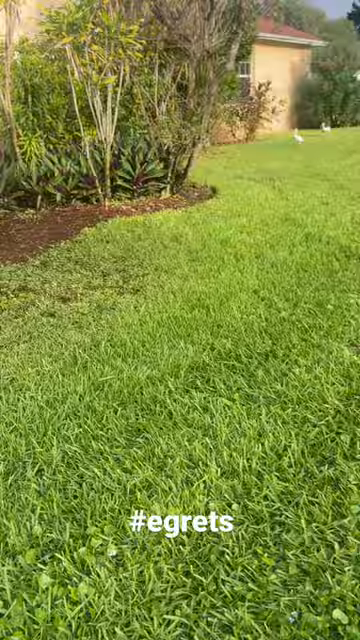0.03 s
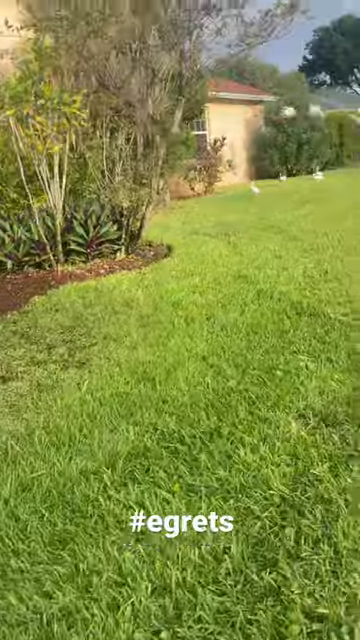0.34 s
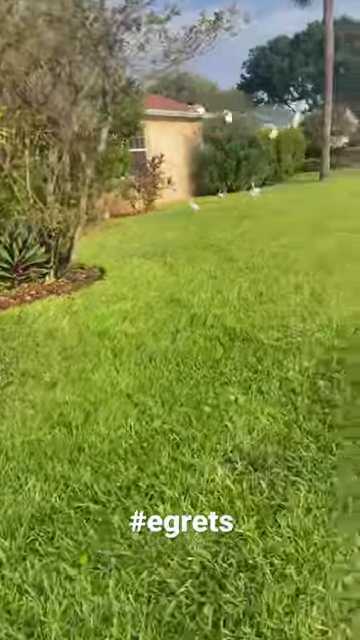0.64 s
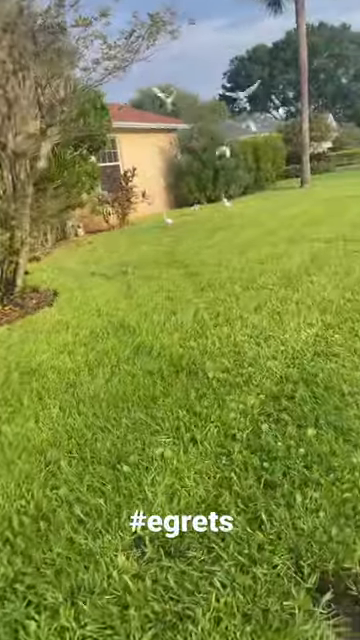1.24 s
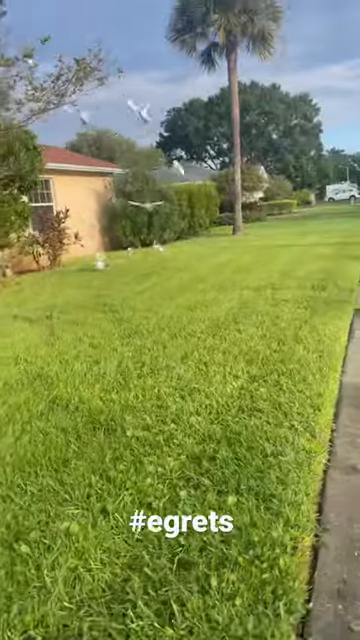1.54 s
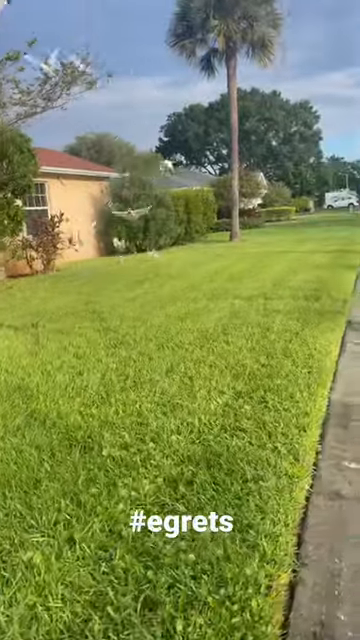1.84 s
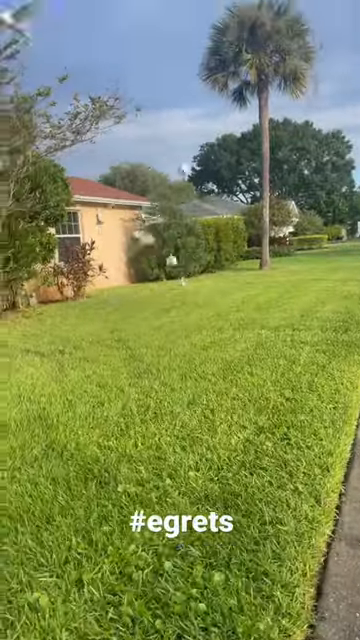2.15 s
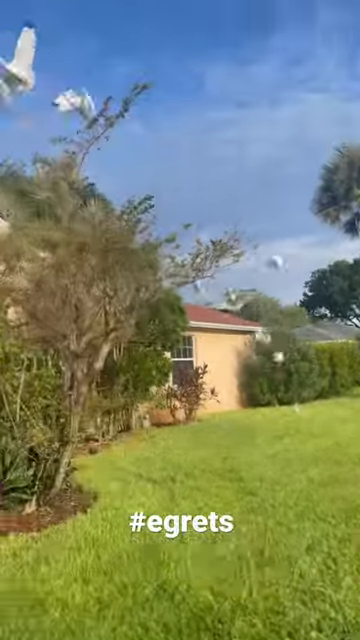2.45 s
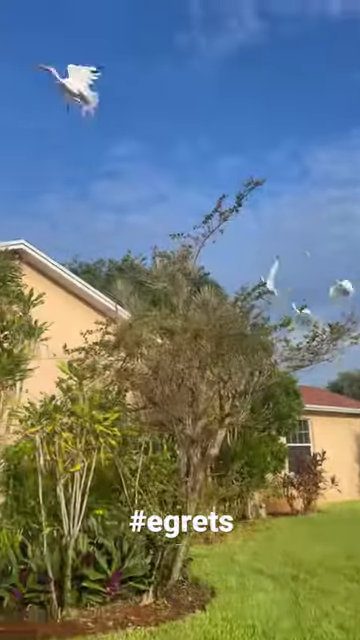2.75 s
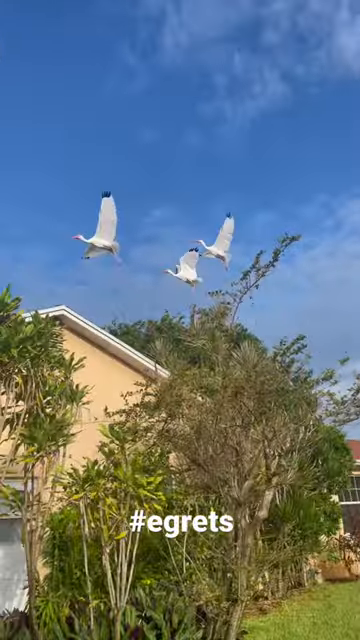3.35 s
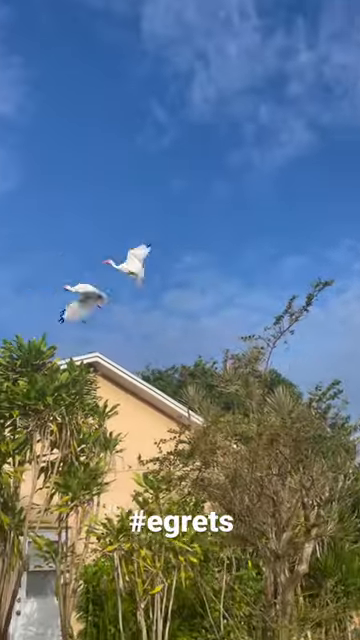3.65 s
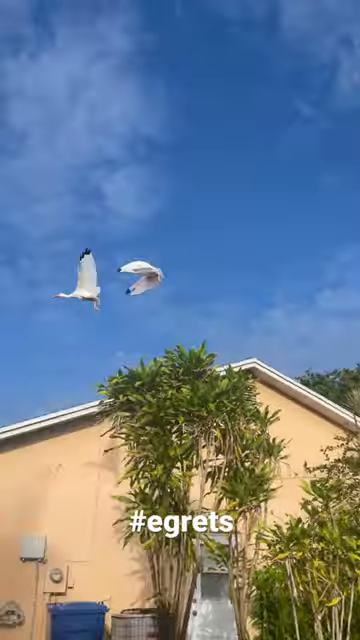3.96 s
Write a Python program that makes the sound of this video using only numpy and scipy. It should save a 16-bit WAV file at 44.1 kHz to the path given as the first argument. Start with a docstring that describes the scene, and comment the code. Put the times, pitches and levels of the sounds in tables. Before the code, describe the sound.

A low drone of traffic and tyre noise carries across a garden as one vehicle pulls away. Near the hand-held microphone are a few soft steps in grass and two light bumps, with faint birds and stirring leaves.

```python
"""A suburban lawn, with traffic heard over low rumble and tyre noise. Each engine sounds harmonics of its
firing rate: one pulls away, doubling its pitch, a second eases off, and two nearly steady motors beat
against each other. Leaves stir and small birds call faintly. Close by come soft rustles and snaps,
probably steps in the grass, and two knocks on the hand-held phone, whose two microphone ports
sample the air slightly apart."""
import sys
import numpy as np
from scipy import signal
from scipy.fft import rfft, irfft
from scipy.io import wavfile
from scipy.ndimage import uniform_filter1d

SR = 44100
rng = np.random.default_rng(int(sys.argv[2]) if len(sys.argv) > 2 else 0)


def dump(signal):
    """Clip the signal to [-1, 1] and save it as 16-bit WAV at the path in sys.argv[1]."""
    limited = np.clip(np.atleast_2d(signal).T, -1, 1)
    pcm = np.round(limited * 32767).astype(np.int16)
    wavfile.write(sys.argv[1], SR, pcm)


N = 176400
T = np.arange(N) / SR
FREQS = np.maximum(np.fft.rfftfreq(N, 1 / SR), 1)

# The two ports. Each row: frequency in Hz, coherence 0-1, left phase lead in rad, left minus right in dB.
PORTS = [(40, 1, 0, 0), (80, 1, .03, .15), (150, .998, .05, .6), (300, .95, .05, 1), (550, .58, .2, 3),
         (850, .55, 1.1, 3), (1350, .58, 1.4, 3), (1750, .8, .5, -2), (2200, .5, 1.7, -2),
         (2700, .8, 2.6, -2), (3900, .45, 2.8, 0), (4900, .75, 3.2, 0), (5900, .92, 6.2, 0),
         (7300, .8, 7.7, 0), (9000, .95, 9.4, 0), (10800, .9, 11.1, 0), (12000, .98, 12.5, 0)]
# Spectra of four background noises. Each row: frequency in Hz, relative spectral density in dB.
RUMBLE_SPECTRUM = [(20, -38), (35, -13), (55, -2.5), (80, -3.5), (130, -4.5), (200, -1.5), (270, -9),
                   (320, -10), (380, -22.5), (600, -29.5), (3000, -88)]
TYRE_SPECTRUM = [(150, -7), (350, -1), (550, -0.5), (800, -3.5), (1250, -2.5), (1600, -11), (2200, -15.5),
                 (4000, -45), (12000, -80)]
HISS_SPECTRUM = [(900, -18.5), (1700, -3.5), (2600, 3), (3200, -5), (4000, -6), (5200, -10.5),
                 (8000, -11.5), (11000, -69), (13000, -54)]
AIR_SPECTRUM = [(1000, -14), (3000, 1.5), (5000, -12), (7000, -1.5), (8500, -19), (9800, 2.5), (11000, 10),
                (11600, 3.5), (12200, -7.5), (12800, -11), (13500, -50)]
# Their strength. Each row: time in seconds, then levels of rumble, tyres, hiss and air in dB.
BACKGROUND_LEVELS = [(0, -24, -35.5, -41, -52), (.2, -34, -38.5, -47, -57.5), (.45, -32.5, -40.5, -48, -57),
                     (1, -35.5, -42.5, -48.5, -56), (1.8, -36.5, -43, -50, -57),
                     (2.4, -37.5, -43, -48.5, -56), (3, -36, -42, -49.5, -54.5),
                     (3.6, -36.5, -41.5, -49.5, -55.5), (4, -36, -41, -47.5, -51.5)]
# Road roar of a receding car. Each row: time in seconds, level in dB.
ROAR_LEVELS = [(0, -49), (.3, -45), (.6, -43.5), (.88, -43.5), (1, -49.5), (1.6, -64), (4, -78)]
# Shrub leaves, clearer as the phone turns to them. Each row: time in seconds, level in dB.
LEAF_LEVELS = [(0, -62), (2.3, -72), (2.75, -64), (3.45, -72), (3.75, -60), (4, -53)]
# Birds in the shrubs. Each row: start and length in seconds, level in dB, centre in Hz, width in octaves.
BIRD_CALLS = [(0.03, .02, -50.5, 4650, 0.045), (1.168, .008, -52, 5850, .04),
              (1.21, 0.022, -54, 5800, .035), (1.178, .03, -48, 4850, 0.26), (1.188, .012, -50, 3350, .08),
              (1.212, 0.054, -48, 3950, 0.26), (1.302, .02, -49, 4850, .2), (1.323, 0.031, -50, 3270, 0.18),
              (1.334, 0.051, -48, 4230, 0.2), (1.431, 0.044, -56, 4402, 0.13),
              (2.271, 0.14, -57.5, 3931, 0.051), (2.749, 0.028, -59, 3664, 0.09),
              (2.772, 0.034, -52, 2360, 0.064), (3.703, 0.022, -41, 2810, 0.019),
              (3.793, 0.017, -51, 2850, .02), (3.887, .015, -48, 2750, .02), (3.869, 0.12, -54, 1845, .04),
              (3.968, .03, -52, 3630, .08)]
# Brushes of grass. Each row: start, attack and decay time constant in seconds, level in dB,
# centre in Hz, width in octaves.
GRASS_RUSTLES = [(.36, 0.027, 0.03, -42.5, 6500, 0.83), (.365, 0.012, 0.013, -37, 1600, 0.13),
                 (.385, 0.023, 0.017, -35.5, 1920, 0.62), (.63, .025, .015, -57, 9500, 0.25),
                 (1.27, 0.026, 0.03, -47.5, 5000, 0.75), (1.278, 0.014, 0.022, -39.5, 2250, 0.31),
                 (1.349, 0.018, 0.013, -43, 8150, 0.52), (1.641, 0.018, 0.0095, -41, 5556, 0.67),
                 (1.641, 0.018, 0.0089, -35, 2500, 0.51)]
# Stems breaking underfoot. Each row: start in seconds, level in dB, centre in Hz.
STEM_SNAPS = [(.378, -45, 6000), (.404, -41, 6500), (.417, -35.5, 2700), (0.656, -50, 9500),
              (1.358, -44, 8000), (1.367, -34, 7600), (1.647, -33, 2700), (1.656, -40, 5500),
              (1.664, -35, 2300)]
# Knocks on the case. Each row: start in seconds, level in dB, frequency in Hz.
CASE_KNOCKS = [(2.43, -22.5, 530), (0.84, -24, 562.6)]
# The engine pulling away. Each row: time in seconds, firing rate in Hz, then the level in dB
# of each harmonic in PULLING_ORDERS.
PULLING_ENGINE = [(0, 38.88, -31.5, -28, -50, -34, -44, -41),
                  (.3, 39.26, -30.5, -44, -48, -38.5, -42, -48.5),
                  (.55, 40.62, -32, -35, -44, -32, -50, -50), (.75, 41.73, -32, -39, -42, -40.5, -45, -52),
                  (1, 43.8, -32.5, -31, -35.5, -38.5, -54, -58), (1.5, 46.38, -39, -26, -40, -40, -62, -69),
                  (1.9, 50.4, -33.5, -25.5, -40, -34.5, -49, -65),
                  (2.25, 53.84, -36, -36.5, -36, -38.5, -58, -60),
                  (2.5, 57.06, -38, -35.5, -33, -44, -51, -66),
                  (3, 63.71, -35.5, -34.5, -27, -61, -52, -61),
                  (3.5, 71.68, -38.5, -36, -39, -57, -57, -70), (4, 79.7, -45, -34, -47, -68, -62, -64)]
PULLING_ORDERS = (1, 2, 3, 4, 6, 8)
# Its weak harmonics. Each row: multiple of the firing rate, level in dB.
PULLING_WEAK_PARTIALS = [(5, -57.5), (7, -62.5)]
# The engine easing off and the two motors. Each row: time in seconds, firing rate in Hz, level in dB.
EASING_ENGINE = [(0, 115.8, -26), (.5, 119.5, -26), (.7, 114.8, -35), (.95, 102.8, -36.5),
                 (1.5, 100.5, -37), (2.35, 103.7, -44), (2.7, 105.7, -33.5), (2.98, 105.2, -35),
                 (3.15, 104.9, -50), (4, 106.5, -41)]
MOTOR_A = [(0, 84.7, -35), (1, 83.4, -32), (2.5, 82.48, -36.5), (4, 81.99, -38)]
MOTOR_B = [(0, 82.83, -37.5), (1, 81.34, -30.5), (2.5, 80.36, -37), (4, 80.06, -39)]
# Their partials. Each row: multiple of the firing rate, relative level in dB.
EASING_PARTIALS = [(.5, -9), (1, 2.5), (2, -19.5)]
MOTOR_A_PARTIALS = [(1, 0), (2, -4), (3, -6), (5, -18)]
MOTOR_B_PARTIALS = [(1, -0.5), (2, -10.5), (3, -7), (5, -26)]


def undb(db):
    """Amplitude grows tenfold for every 20 dB."""
    return 10 ** (np.asarray(db) / 20)


def over_time(table):
    """Linear interpolation of each column over time."""
    times, *columns = np.array(table, float).T
    return [np.interp(T, times, column) for column in columns]


def over_frequency(table):
    """Interpolation of each column on a logarithmic frequency axis."""
    hz, *columns = np.array(table, float).T
    return [np.interp(np.log(FREQS), np.log(hz), column) for column in columns]


def waver(rate_hz):
    """Low-pass filtering turns random steps into a smooth fluctuation of unit spread."""
    hold = max(int(SR / rate_hz), 1)
    steps = np.repeat(rng.standard_normal(N // hold + 1), hold)
    smooth = uniform_filter1d(uniform_filter1d(steps, hold), hold)[:N]
    return smooth / smooth.std()


def band(hz, octaves):
    """A Gaussian spectrum in dB, 4.3 dB down at `octaves` either side of its centre."""
    return -4.3 * (np.log2(FREQS / hz) / octaves) ** 2


def at_ports(shared, diffuse):
    """Partial coherence: two spectra mix into left and right signals, offset in phase and level."""
    coherence, lead, balance_db = over_frequency(PORTS)
    side = np.array([[1], [-1]])
    pair = shared * np.sqrt((1 + coherence) / 2) + side * diffuse * np.sqrt((1 - coherence) / 2)
    return irfft(pair * np.exp(side * .5j * lead) * undb(side * balance_db / 2), N)


def noise(spectrum_db):
    """Spectral shaping colours white noise; the result is stereo with an rms of 1."""
    shared, diffuse = rfft(rng.standard_normal((2, N))) * undb(spectrum_db)
    pair = at_ports(shared, diffuse)
    return pair / pair.std()


def envelope(age, attack_s, hold_until_s, decay_s):
    """A linear rise, an optional hold and an exponential decay."""
    return np.clip(age / attack_s, 0, 1) * np.exp(-np.maximum(age - hold_until_s, 0) / decay_s)


def road_roar():
    """Intensity falls with distance: a car's band of road noise swells, then dies away as it recedes."""
    level_db, = over_time(ROAR_LEVELS)
    return noise(band(hz=704, octaves=.43)) * undb(level_db + 1.5 * waver(14))


def background():
    """Incoherent noises add in power: rumble, tyres, hiss and thin high air, each wavering a little."""
    rumble_db, tyre_db, hiss_db, air_db = over_time(BACKGROUND_LEVELS)
    rumble = noise(*over_frequency(RUMBLE_SPECTRUM)) * undb(rumble_db + 1.1 * waver(6.59))
    tyres = noise(*over_frequency(TYRE_SPECTRUM)) * undb(tyre_db + .68 * waver(13))
    hiss = noise(*over_frequency(HISS_SPECTRUM)) * undb(hiss_db + .7 * waver(14))
    air = noise(*over_frequency(AIR_SPECTRUM)) * undb(air_db + .4 * waver(18))
    return rumble + tyres + hiss + air


def leaves():
    """Random amplitude modulation gives a thin band of noise the grain of stirring leaves."""
    level_db, = over_time(LEAF_LEVELS)
    return noise(band(hz=3000, octaves=.33)) * undb(level_db + 1.5 * waver(120))


def birds(rasp_db=2.2):
    """Bandwidth sets timbre: narrow calls whistle, wide ones rasp. Leaves and walls blur their ends."""
    out = 0
    for start, length, db, hz, octaves in BIRD_CALLS:
        shape = envelope(T - start, attack_s=.0043, hold_until_s=length, decay_s=.013)
        out += noise(band(hz, octaves)) * shape * undb(db + rasp_db * waver(150))
    return out


def grass_rustles(grain_db=1.5):
    """Friction in brushed grass gives short, grainy bursts of noise that swell and fade."""
    out = 0
    for start, attack, decay, db, hz, octaves in GRASS_RUSTLES:
        shape = envelope(T - start, attack, hold_until_s=attack, decay_s=decay)
        out += noise(band(hz, octaves)) * shape * undb(db + grain_db * waver(600))
    return out


def stem_snaps(decay_s=.002):
    """Fracture is impulsive: each dry stem gives noise with an instant rise and a very short decay."""
    out = 0
    for start, db, hz in STEM_SNAPS:
        age = T - start
        shape = (age >= 0) * np.exp(-np.abs(age) / decay_s)
        out += noise(band(hz, octaves=.51)) * shape * undb(db)
    return out


def case_knocks(rise_s=.0016, left_gain=-.3):
    """Damped vibration: bumped by a finger, the case rings a few dull cycles, mostly at the right port."""
    out = 0
    for start, db, hz in CASE_KNOCKS:
        age = np.maximum(T - start, 0)
        shape = age / rise_s * np.exp(1 - age / rise_s)
        out += undb(db) * shape * np.sin(2 * np.pi * hz * age)
    return out * np.array([[left_gain], [1]])


def exhaust(firing_hz, partials, rate_wobble=.0035, flutter_db=1.7):
    """Nearly periodic firing gives a harmonic series; each partial flutters on its way through the air."""
    phase = 2 * np.pi * np.cumsum(firing_hz * (1 + rate_wobble * waver(9))) / SR
    out = 0
    for order, db in partials:
        amplitude = np.sqrt(2) * undb(db + flutter_db * waver(8))
        out += amplitude * np.sin(order * phase + rng.uniform(0, 2 * np.pi))
    return out


def engines():
    """Superposition of four exhausts: one speeds up, one eases off, and two about 2 Hz apart beat."""
    firing_hz, *levels_db = over_time(PULLING_ENGINE)
    out = exhaust(firing_hz, [*zip(PULLING_ORDERS, levels_db), *PULLING_WEAK_PARTIALS])
    drones = (EASING_ENGINE, EASING_PARTIALS), (MOTOR_A, MOTOR_A_PARTIALS), (MOTOR_B, MOTOR_B_PARTIALS)
    for course, partials in drones:
        firing_hz, level_db = over_time(course)
        out += exhaust(firing_hz, [(order, level_db + relative_db) for order, relative_db in partials])
    return at_ports(rfft(out), diffuse=0)


def scene():
    """Sound pressures add linearly at the phone."""
    traffic = engines() + road_roar() + background()
    return traffic + grass_rustles() + stem_snaps() + leaves() + birds() + case_knocks()


def record(dry):
    """Gating and band limiting: the microphone opens after a moment and a steep low-pass cuts the top."""
    open_at_s, ramp_s, cutoff_hz = .036, .004, 13200
    opening = np.clip((T - open_at_s) / ramp_s + .5, 0, 1)
    low_pass = signal.ellip(10, .2, 90, cutoff_hz, fs=SR, output="sos")
    return signal.sosfilt(low_pass, dry * opening)


dry = scene()
out = record(dry)
dump(out)
```